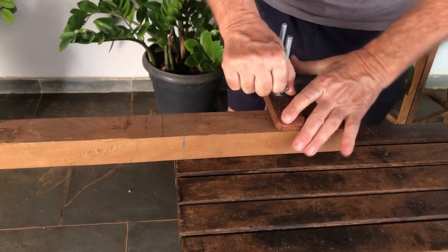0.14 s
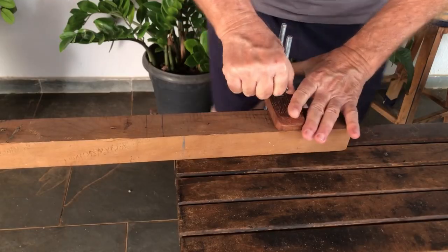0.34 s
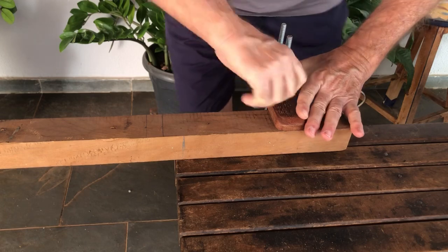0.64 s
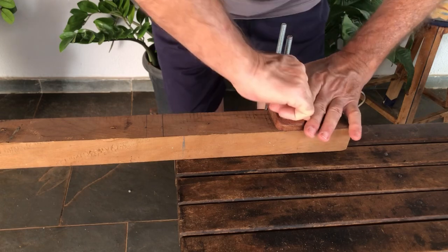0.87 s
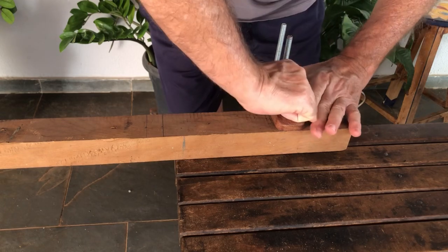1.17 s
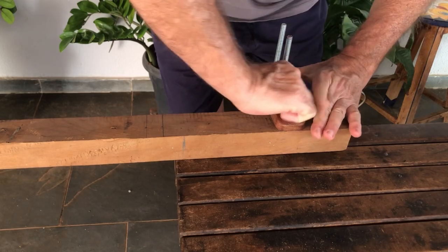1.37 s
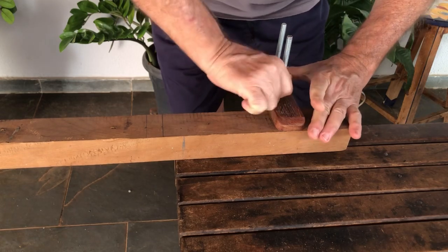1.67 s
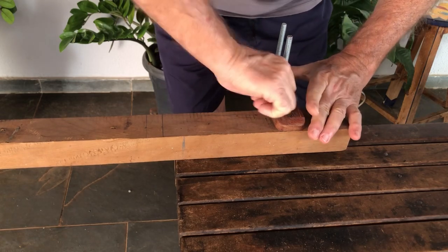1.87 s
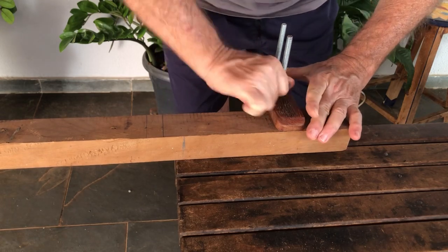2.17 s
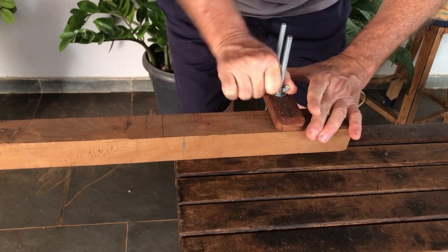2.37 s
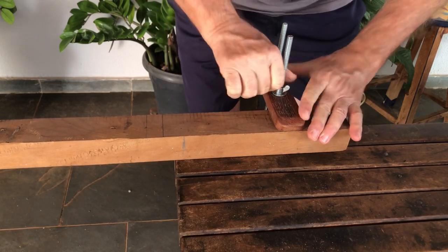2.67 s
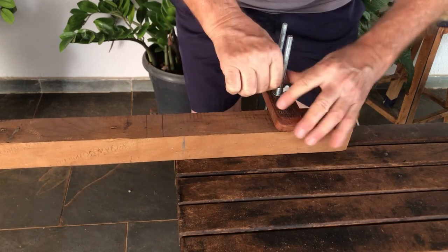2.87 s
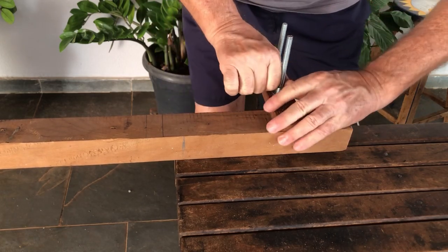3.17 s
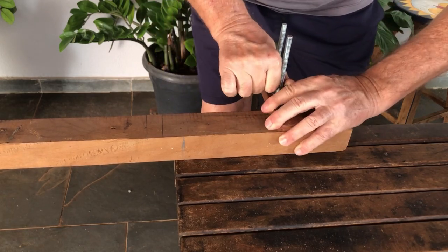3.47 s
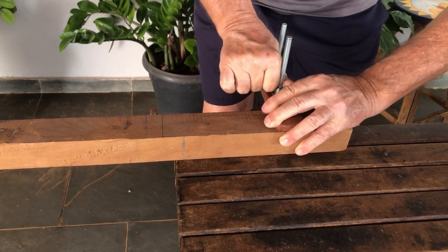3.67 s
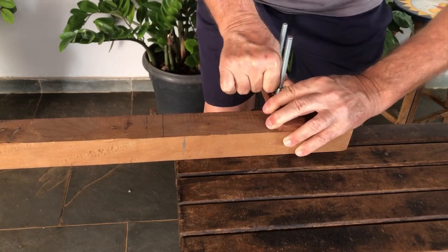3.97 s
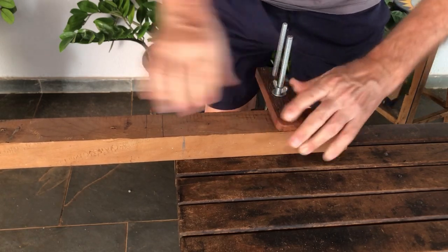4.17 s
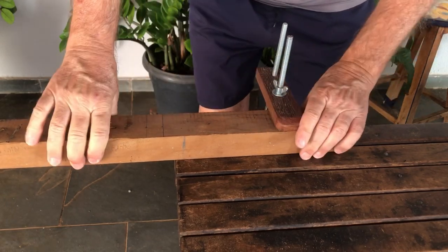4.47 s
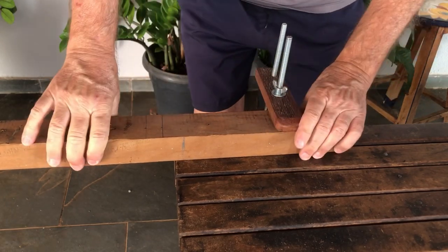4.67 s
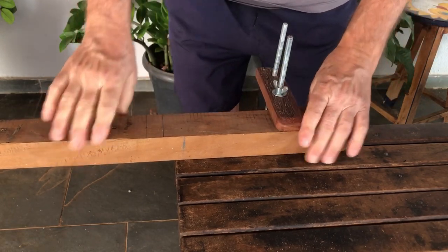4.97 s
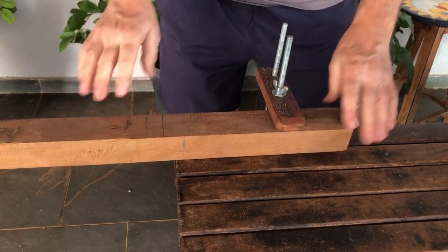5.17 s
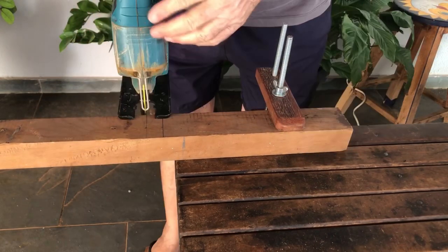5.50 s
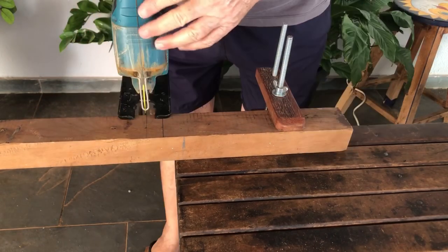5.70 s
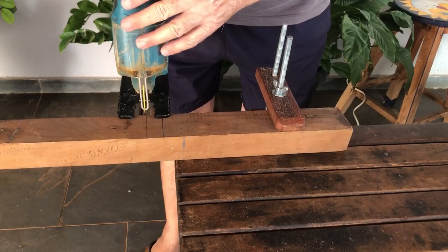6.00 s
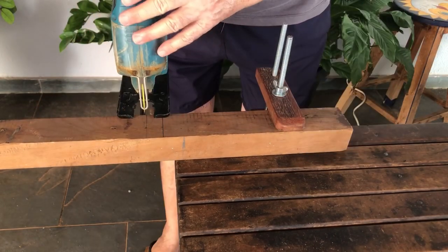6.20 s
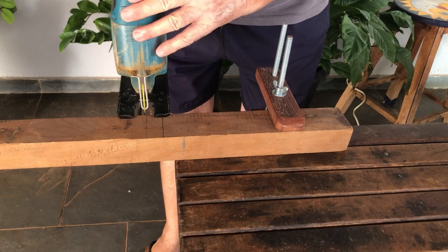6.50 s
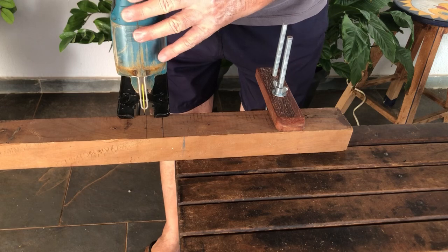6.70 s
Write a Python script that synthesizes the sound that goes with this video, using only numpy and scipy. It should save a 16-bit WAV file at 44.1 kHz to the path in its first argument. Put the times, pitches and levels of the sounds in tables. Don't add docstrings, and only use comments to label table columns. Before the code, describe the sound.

On a quiet tiled porch with faint traffic, hands slide over a wooden beam, bumping it and making steel clamp rods ring. The wing nut creaks in quick dry ticks, with a few more knocks and a distant bird whistle. Then a jigsaw clacks and grinds slowly, its trigger clicks, and it races up to a loud, harsh rattle. Close mono microphone.

```python
import sys
import numpy as np
from scipy import signal
from scipy.fft import rfft, irfft, next_fast_len
from scipy.io import wavfile
from scipy.ndimage import uniform_filter1d

SR = 44100
rng = np.random.default_rng(int(sys.argv[2]) if len(sys.argv) > 2 else 0)


def store_pcm(level_fs):
    pcm = np.round(np.clip(level_fs, -1, 1) * 32767).astype(np.int16)
    wavfile.write(sys.argv[1], SR, np.atleast_2d(pcm).T)


def boost(x):
    u = np.asarray(x, float) / 20
    return 10 ** u


N = 302085
T, SIZE = np.arange(N) / SR, next_fast_len(N)
HZ = np.arange(SIZE // 2 + 1) * SR / SIZE + 1e-3

# freq_hz, density_db (per Hz)
PORCH_SPECTRUM = [(15, -42), (25, -14), (68, -1.5), (123, 2.5), (284, -6), (372, -4.5), (693, -12.5),
                  (1100, -10.5), (1600, -17.5), (3320, -21), (8320, -30.5), (14700, -28.5), (15900, -35)]
PORCH_DB = -64.5
ROOM_T60_S, ROOM_DB = 0.75, -11

# start_s, length_s, held_pitch_hz, level_db, scoop_from_below_hz
FAR_CALLS = [
    (2.02, .05, 3200, -77, 800),
    (2.38, .04, 1330, -68, 40),
    (2.49, 0.2, 3310, -69.5, 40),
    (4.83, .33, 3265, -66.5, 1000),
    (5.36, 0.12, 1200, -74, 40),
    (2.792, .08, 11350, -80, 40),
    (5.34, .08, 11390, -81, 40),
]
SCOOP_S, CALL_ATTACK_S, CALL_FADE_DB_PER_S = 0.056, 0.02, -78

# peak_s, rise_s, skin_hiss_db, dry_rustle_db
SLIDES = [(.178, 0.096, -53, -57), (.41, .04, -71.5, -75), (.643, 0.1, -54, -56), (1.32, 0.081, -64, -73),
          (1.52, 0.052, -71, -75), (1.66, 0.057, -75, -77), (2.27, 0.089, -69.5, -75),
          (2.83, 0.059, -77, -77), (2.95, .05, -77, -73), (3.13, .05, -71.5, -76), (3.28, .03, -71, -69.5),
          (3.45, 0.094, -65.5, -72.5), (3.63, .08, -70, -77), (3.75, 0.025, -75, -75),
          (3.86, .04, -68, -73), (3.99, 0.018, -71, -76), (4.1, .035, -74, -69.5), (4.255, 0.018, -82, -75),
          (4.38, .05, -70.5, -72), (4.51, 0.032, -68, -81), (4.95, 0.036, -71, -67), (5.36, .04, -81, -84)]
# freq_hz, density_db (per Hz)
SKIN_SPECTRUM = [(900, -9), (1500, -3.5), (1900, -2.5), (2600, -1), (5000, -1), (7000, -4.5), (9000, -9.5),
                 (11000, -25)]
# freq_hz, density_db (per Hz)
RUSTLE_SPECTRUM = [(4710, -8), (8000, -8), (11200, -3), (12200, -3.5), (15100, -2.5), (15900, 4)]
REST_HISS_DB, REST_RUSTLE_DB = -77.5, -82

# peak_s, rise_s, rumble_db, scrape_db
PRESSES = [(.11, 0.068, -57.5, -62), (.38, 0.054, -64.5, -67), (.66, 0.085, -69, -62),
           (.97, .04, -58, -57.5), (1.1, 0.035, -54.5, -58), (1.35, 0.076, -50, -56.5),
           (1.62, 0.044, -60, -63), (1.83, 0.035, -65.5, -73), (1.97, 0.034, -58.5, -71),
           (2.13, .06, -56.5, -66), (2.58, 0.073, -61, -67), (2.72, 0.071, -62, -73), (2.95, .05, -64, -84),
           (3.17, .04, -67, -69), (3.31, 0.049, -61.5, -70), (3.51, 0.063, -56, -57),
           (3.68, 0.086, -54, -60.5), (3.82, 0.062, -57.5, -57), (3.97, 0.086, -57.5, -55),
           (4.18, 0.032, -63, -79), (4.29, .03, -67, -79), (4.41, 0.046, -62, -67),
           (4.54, 0.042, -56.5, -57), (4.74, 0.06, -58, -78), (4.87, 0.038, -61.5, -76),
           (5.35, .06, -74, -63), (5.92, .08, -54, -54)]
# peak_s, rise_s, level_db
BENCH_THUDS = [(.4, .08, -71), (.7, 0.065, -68), (.95, .06, -72), (1.36, 0.064, -66), (1.52, .05, -67),
               (1.86, .06, -65), (2.11, 0.042, -58), (2.7, .06, -73), (3.53, .04, -67),
               (3.68, 0.076, -57.5), (4.21, .03, -68), (4.42, 0.079, -62), (4.63, .06, -72)]
# freq_hz, width_hz, level_db
BEAM_MODES = [(173, 300, 9), (357, 77, 3.5), (612, 44, 9), (1032, 33, 9.5), (1507, 13, -2),
              (1760, 25, -20.5), (1980, 34, -18)]
REST_RUMBLE_DB, REST_SCRAPE_DB, REST_THUD_DB = -76, -75, -80
PRESS_RELEASE, SLIDE_RELEASE = 1.88, 1.57

# start_s, peak_db, main_ring_hz, crack_db, rod_ring_share_db
KNOCKS = [(0.083, -46.5, 419, -63, -1), (0.355, -56, 467, -64, -11), (0.931, -42.5, 435, -61.5, 5),
          (1.068, -42.5, 612, -64, 7), (1.294, -47, 185, -69, -7), (1.463, -38, 1043, -60, -21),
          (1.589, -48, 994, -78, -7), (1.793, -43, 327, -66, -23), (1.946, -50.5, 594, -70, -11),
          (2.084, -37, 402, -46, -14.5), (2.447, -38, 823, -56.5, -23), (2.553, -47, 600, -69, -2),
          (3.288, -45.5, 342, -81, -20), (3.472, -43.5, 157, -60, -3), (3.623, -46, 356, -69, -10),
          (3.919, -38.5, 1022, -47, -2.5), (4.499, -39.5, 1130, -47.5, -15),
          (4.662, -34.5, 359, -72, -33.5), (4.769, -52, 375, -80, -21)]
# freq_hz, level_db
WOOD_MODES = [(156, 3.5), (350, 0), (425, -0.5), (522, -5), (620, -2), (780, 2.5), (1350, -4), (1740, -5),
              (2320, -30), (2750, -9)]
# freq_hz, level_db, t60_s
ROD_MODES = [(648.4, -2.5, 0.24), (1003, -4.5, 0.29), (1036, -4.5, 0.36), (1493, -6.5, 0.24),
             (1741, -10.5, 0.22), (1988, -11.5, .2)]
FREE_T60_S, HAND_DAMPING = 0.24, 0.4

# start_s, peak_db, ring_hz
NUT_SLIPS = [(3.5443, -57, 3640), (3.5717, -57, 2600), (3.6189, -51.5, 2560), (3.632, -61, 3900),
             (3.643, -55, 3620), (3.655, -54, 3620), (3.6655, -56, 3580), (3.678, -56, 3900),
             (3.69, -53, 3950), (3.7089, -56, 3920), (3.7314, -55, 3930), (3.7495, -53.5, 2610),
             (3.7665, -53, 2620), (3.7872, -51, 3800), (3.8212, -52, 3940), (3.8481, -49.5, 3910),
             (3.8905, -52, 2660), (3.917, -51, 3220)]
# start_s, peak_db, ring_hz
SMALL_TICKS = [(0.1101, -47, 15000), (0.398, -60, 9050), (1.5778, -50, 15000), (2.0827, -58, 14300),
               (3.5114, -50, 13900), (3.6197, -59, 13300), (3.708, -62, 12100), (3.7414, -62, 15000),
               (3.8477, -58, 12300), (3.8841, -58, 15000), (3.9898, -64, 14900), (4.0736, -58, 14900),
               (4.4418, -58, 15000)]

# time_s, level_db
IDLE_LEVEL = [
    (5.51, -90),
    (5.526, -45.5),
    (5.58, -50),
    (5.636, -45.5),
    (5.672, -54),
    (5.796, -50.5),
    (5.974, -62.5),
    (5.981, -62),
]
# start_s, peak_db
IDLE_CLACKS = [
    (5.5258, -28),
    (5.5351, -23.5),
    (5.603, -34),
    (5.7162, -28),
    (5.8, -40),
    (5.889, -38),
]
# freq_hz, density_db (per Hz)
IDLE_SPECTRUM = [(88, -10), (150, -1.5), (235, -1), (334, -2), (414, -5.5), (1750, -1.5), (2540, -1),
                 (2800, -4), (3830, -5), (4300, -9.5), (15900, -30)]
# freq_hz, width_hz, level_db
CASING_MODES = [(1005, 23, -4), (1430, 130, 4), (1600, 24, -19), (1870, 35, -10), (2520, 120, 6.5),
                (3220, 120, 2), (3790, 170, 6), (4580, 94, -22)]
IDLE_TREBLE_DB, IDLE_DULLING_DB_PER_S = -6, -7
TRIGGER_S, TRIGGER_DB = 5.983, -41.5

# time_s, rattle_db
RUN_LEVEL = [
    (5.984, -50),
    (5.996, -35),
    (6.086, -26),
    (6.2, -22.5),
    (6.424, -22),
    (6.85, -21.5),
]
# time_s, blade_strokes_per_s
SPEED = [(5.975, 13), (6.1, 28.5), (6.2, 37.5), (6.3, 43), (6.38, 45.7), (6.44, 47.2), (6.6, 50.3),
         (6.73, 52.1), (6.85, 53.2)]
# freq_hz, density_db (per Hz)
RATTLE_SPECTRUM = [(65, -51), (110, -23), (547, -12.5), (945, -6), (1300, -8.5), (1630, -5.5), (1730, -9),
                   (2210, -4), (2820, -6.5), (3480, -2.5), (4790, -6.5), (7390, -7.5), (10000, -24),
                   (13000, -35), (22000, -120)]
# freq_hz, width_hz, level_db
HOUSING_MODES = [(1540, 340, -5), (2540, 360, 2.5), (3210, 340, 2), (3790, 270, 3.5), (5870, 280, -6),
                 (6700, 160, -17)]
# freq_hz, density_db (per Hz)
FAN_SPECTRUM = [(4710, -7), (8000, -4), (10300, -9.5), (13700, -4), (15000, -0.5), (15900, -7)]
# multiple_of_stroke_rate, level_db
STROKE_HARMONICS = [(1, 0.5), (2, -8.5), (3, -6.5), (4, -11.5), (5, -23), (6, -15), (7, -9), (8, -5),
                    (9, -5.5)]
GEAR_TEETH, BRUSH_PASSES, TOP_SPEED = 43.8, 329.0, 53.0
GEAR_DB, GEAR_LIFT_DB, GEAR_LIFT_SPEED, GEAR_LIFT_WIDTH = -18, 10.5, 43, 2.4
FAN_DB, FAN_POWER = 0.7, 0.91
SHAKE_DB, SHAKE_POWER = -24.5, 1.2
HOUSING_DB, HOUSING_POWER = -9, -0.69


def unit(x):
    return x / np.sqrt(np.mean(x ** 2))


def colour(x, points):
    hz, db = np.transpose(points)
    gain = boost(np.interp(np.log(HZ), np.log(hz), db, -90, -90))
    return unit(irfft(rfft(x, SIZE) * gain, SIZE)[:N])


def resonate(x, modes):
    response = sum(boost(db) / (1 + 1j * (HZ ** 2 - f ** 2) / (HZ * width)) for f, width, db in modes)
    return unit(irfft(rfft(x, SIZE) * response, SIZE)[:N])


def walk(rate):
    hold = int(SR / rate)
    steps = np.repeat(rng.standard_normal(N // hold + 1), hold)
    return unit(uniform_filter1d(uniform_filter1d(steps, hold), hold)[:N])


def grit(spread_db):
    return rng.standard_normal(N) * boost(spread_db * np.minimum(rng.exponential(size=N), 4.5))


def curves(table):
    s, *columns = np.transpose(table)
    gate = uniform_filter1d(1.0 * (T >= s[0]) * (T <= s[-1]), 200)
    return [gate] + [np.interp(T, s, c) for c in columns]


def swells(table, release, rests_db):
    power = boost(np.array(rests_db))[:, None] ** 2 * np.ones(N)
    for s, rise, *db in table:
        span = slice(max(int((s - 2 * rise) * SR), 0), int((s + 2 * rise * release) * SR))
        x = (T[span] - s) / np.where(T[span] < s, rise, rise * release)
        power[:, span] += boost(np.array(db)[:, None] - 12 * x ** 2) ** 2
    return np.sqrt(power)


def add(out, s, x):
    i = int(s * SR)
    out[i:i + len(x)] += x[:N - i]


def ring(hz, t60, phase=0.0, size=SR // 4):
    t = T[:size]
    return np.sin(2 * np.pi * hz * t + phase) * np.exp(-np.log(1000) * t / t60)


def porch():
    return boost(PORCH_DB + 0.27 * walk(3.1)) * colour(rng.standard_normal(N), PORCH_SPECTRUM)


def whistles():
    out = np.zeros(N)
    flutter, waver = boost(4.0 * walk(75)), 1 + 0.007 * walk(170)
    for s, length, hz, db, scoop_hz in FAR_CALLS:
        t = T[:int(length * SR)]
        span = slice(int(s * SR), int(s * SR) + len(t))
        pitch = (hz - scoop_hz * np.clip(1 - t / SCOOP_S, 0, 1)) * waver[span]
        attack_s = CALL_ATTACK_S + SCOOP_S * scoop_hz / 900
        shape = np.clip(t / attack_s, 0, 1) ** 1.1 * signal.windows.tukey(len(t), 0.15)
        level = boost(db + 4.5 + CALL_FADE_DB_PER_S * t)
        add(out, s, shape * level * flutter[span] * np.sin(2 * np.pi * np.cumsum(pitch) / SR))
    return out


def palms():
    hiss, rustle = swells(SLIDES, SLIDE_RELEASE, [REST_HISS_DB, REST_RUSTLE_DB])
    skin = boost(1.1 * walk(43)) * colour(grit(0.87), SKIN_SPECTRUM)
    cloth = boost(1.1 * walk(40)) * colour(grit(1.7), RUSTLE_SPECTRUM)
    return hiss * skin + rustle * cloth


def hands():
    rumble, scrape = swells(PRESSES, PRESS_RELEASE, [REST_RUMBLE_DB, REST_SCRAPE_DB])
    thud = swells(BENCH_THUDS, PRESS_RELEASE, [REST_THUD_DB])[0]
    beam = resonate(grit(2.2), BEAM_MODES)
    bench = colour(rng.standard_normal(N), [(30, -26), (48, -4), (85, 3.5), (120, -9)])
    low = colour(beam, [(70, -8), (120, 7.5), (550, 1.0), (800, -23)])
    rubbed = beam + 1.8 * rng.standard_normal(N)
    high = colour(rubbed, [(500, -25), (750, 7.5), (1900, 2.5), (2800, -1)])
    low = low * boost(-2.0 + 2.3 * walk(25.09))
    high = high * boost(-4.5 + 1.6 * walk(26.98))
    return thud * bench + rumble * low + scrape * high


def knocks():
    out = np.zeros(N)
    crack = colour(rng.standard_normal(N), [(700, -16), (1200, 3.0), (2500, -4.0), (5000, -13.5), (8000, -28)])
    joints = resonate(rng.standard_normal(N), BEAM_MODES)
    joints = colour(joints, [(40, -22), (200, 8.5), (1500, 1), (3000, 4.5), (6000, -20)])
    for (s, db, hz, crack_db, rod_db), chance in zip(KNOCKS, rng.random((len(KNOCKS), 20))):
        t60 = FREE_T60_S * boost(HAND_DAMPING * rod_db)
        x = ring(hz, t60 * min(420 / hz, 1) ** 1.15)
        t = T[:len(x)]
        for (f, g), u in zip(WOOD_MODES, chance):
            near_db = g - 4.5 - 4.8 * abs(np.log2(f / hz))
            x += boost(near_db) * ring(f * (1 + 0.13 * (u - 0.5)), t60 * (400 / f) ** 0.27, 2 * np.pi * u)
        for (f, g, rod_t60), u in zip(ROD_MODES, chance[len(WOOD_MODES):]):
            x += boost(g + rod_db) * ring(f, rod_t60, 2 * np.pi * u)
        start = int(chance[-1] * N / 2)
        span = slice(start, start + len(t))
        shudder = joints[span] * np.exp(-np.log(1000) * t / (1.93 * t60))
        x = x / np.abs(x).max() + 0.22 * shudder
        add(out, s, boost(db) * x * (1 - np.exp(-t / 0.0011)))
        burst = np.exp(-t / 0.0034) + 0.16 * np.exp(-t / 0.04)
        onset = 1 - np.exp(-(t / 0.00045) ** 2)
        add(out, s, boost(crack_db + 6.0) * crack[span] * burst * onset)
    return out


def creak():
    out, jolt = np.zeros(N), np.zeros(N)
    t, slip = T[:1500], rng.standard_normal(N)
    size = len(t)
    ticks = colour(rng.standard_normal(N),
                   [(500, -14), (1300, 7), (2500, -2.0), (3900, 7.5), (5200, -4), (6500, -20)])
    onset = 1 - np.exp(-(t / 0.00056) ** 2)
    for (s, db, hz), u in zip(NUT_SLIPS, rng.random(len(NUT_SLIPS))):
        start = int(u * N / 2)
        x = 0.75 * ring(hz, 0.011, size=size)
        x += 0.6 * ring(13600 * (1 + 0.15 * (u - 0.5)), 0.006, size=size)
        x += 1.05 * ticks[start:start + size] * np.exp(-t / 0.0032)
        add(out, s, boost(db) * x * onset)
        add(jolt, s, boost(db) * np.hanning(260) * slip[start:start + 260])
    for s, db, hz in SMALL_TICKS:
        x = ring(hz, 0.0065, size=size) + 0.49 * ring(hz * 0.77, 0.005, size=size)
        add(out, s, boost(db) * x)
    beam = colour(resonate(jolt, BEAM_MODES), [(60, -2), (1800, 2), (5000, -24)])
    return out + boost(-72.0) * beam


def idle():
    gate, db = curves(IDLE_LEVEL)
    treble_db = IDLE_TREBLE_DB + IDLE_DULLING_DB_PER_S * np.clip(T - IDLE_LEVEL[0][0], 0, 1)
    strikes = gate * boost(db + 0.92 * walk(120)) * grit(2.05)
    for s, peak_db in IDLE_CLACKS:
        clack = np.gradient(rng.standard_normal(400)) * np.exp(-T[:400] / 0.0015)
        add(strikes, s, boost(peak_db - 4.0) * clack)
    scale = np.sqrt(np.mean(strikes ** 2))
    body = colour(strikes, IDLE_SPECTRUM) + 0.55 * resonate(strikes, CASING_MODES)
    fizz = colour(grit(2.4), [(4200, -17), (5200, 6), (6300, 2), (7500, -3), (11000, -16), (14500, -9),
                              (15900, -4)])
    return boost(-5.0) * scale * body + gate * boost(db + treble_db - 6.5) * fizz


def trigger():
    out = np.zeros(N)
    add(out, TRIGGER_S, np.diff(rng.standard_normal(400)) * np.exp(-T[:399] / 0.002))
    return boost(TRIGGER_DB) * out


def saw():
    gate, db = curves(RUN_LEVEL)
    speed = curves(SPEED)[1]
    relative = speed / TOP_SPEED
    turn = 2 * np.pi * np.cumsum(speed * gate) / SR
    slaps = 0.8 * np.cos(turn) + 0.76 * np.cos(2 * turn + 1.06)
    slaps += 1.64 * np.cos(4 * turn + 0.29 * walk(30)) + 1.6 * walk(500)
    strikes = boost(slaps) * grit(0.99)
    housing = boost(HOUSING_DB) * relative ** HOUSING_POWER * resonate(strikes, HOUSING_MODES)
    rattle = colour(strikes, RATTLE_SPECTRUM) + housing
    fan = colour(boost(0.49 * slaps) * grit(0.92), FAN_SPECTRUM)
    gear_db = GEAR_DB + GEAR_LIFT_DB / (1 + np.exp((GEAR_LIFT_SPEED - speed) / GEAR_LIFT_WIDTH))
    gear_size = np.clip(speed / 30, 0, 1) * boost(1.4 * slaps + 2.1 * walk(220) + 0.88 * walk(25) - 3.5)
    gear = gear_size * np.sin(GEAR_TEETH * turn + 1.3 * np.sin(turn) + 1.26 * walk(150))
    brush_size = np.clip(speed / 45, 0, 1) ** 8 * boost(3.0 * walk(200))
    brushes = brush_size * np.sin(BRUSH_PASSES * turn + 1.6 * walk(250))
    wobble, shake = walk(8), np.zeros(N)
    for k, g in STROKE_HARMONICS:
        bass_fade = np.clip(k * speed / 47, 0, 1) ** 6
        level = boost(g + 0.4 * k ** 0.79 * np.roll(wobble, k * SR // 2))
        shake += bass_fade * level * np.sin(k * (turn + 0.096 * wobble))
    mix = rattle + boost(gear_db) * gear
    mix += boost(FAN_DB) * relative ** FAN_POWER * (fan + 0.47 * brushes)
    mix += boost(SHAKE_DB) * relative ** SHAKE_POWER * shake
    return gate * boost(db) * mix


def scene():
    near = knocks() + trigger() + creak() + idle() + saw() + whistles()
    t = T[:SR // 2]
    tail = rng.standard_normal(len(t)) * np.exp(-np.log(1000) * t / ROOM_T60_S) * (t > 0.004)
    tail = signal.lfilter([1], [1, -0.5], tail)
    echo = signal.fftconvolve(near, tail / np.sqrt(np.sum(tail ** 2)))[:N]
    return np.tile(near + boost(ROOM_DB) * echo + hands() + palms() + porch(), (2, 1))


def roll_off(x):
    return signal.sosfilt(signal.butter(12, 16430, fs=SR, output="sos"), x)


def record(dry):
    soft = np.tanh(1.7 * dry) / 1.7
    top_cut = np.clip((15735 - HZ) / 60, 0, 1)
    mix = irfft(rfft(soft, SIZE) * top_cut, SIZE)[:, :N]
    return roll_off(mix)


dry = scene()
out = record(dry)
store_pcm(out)
```